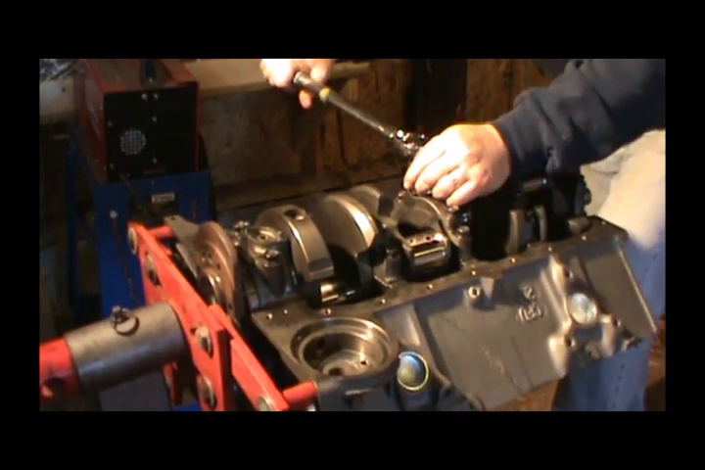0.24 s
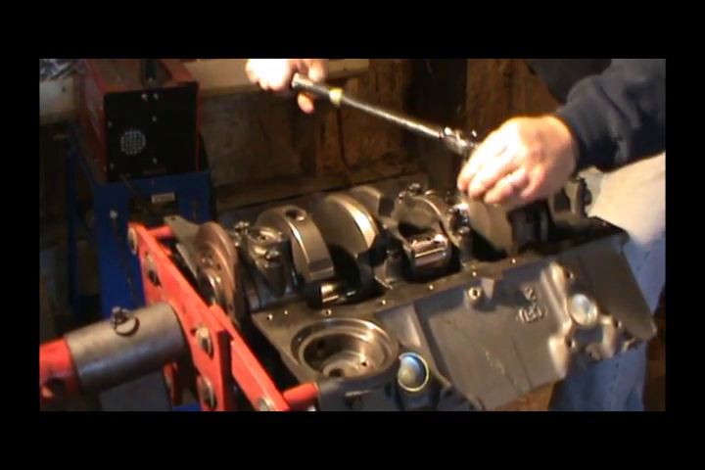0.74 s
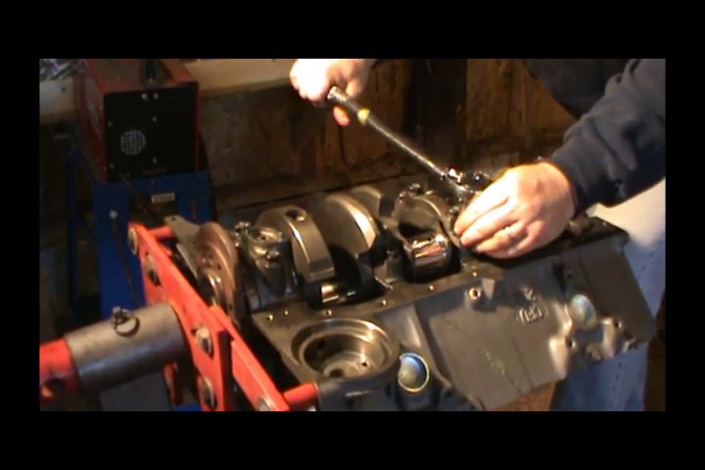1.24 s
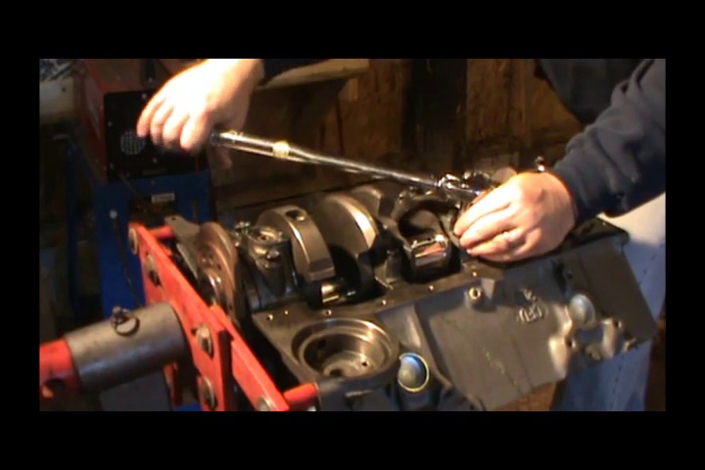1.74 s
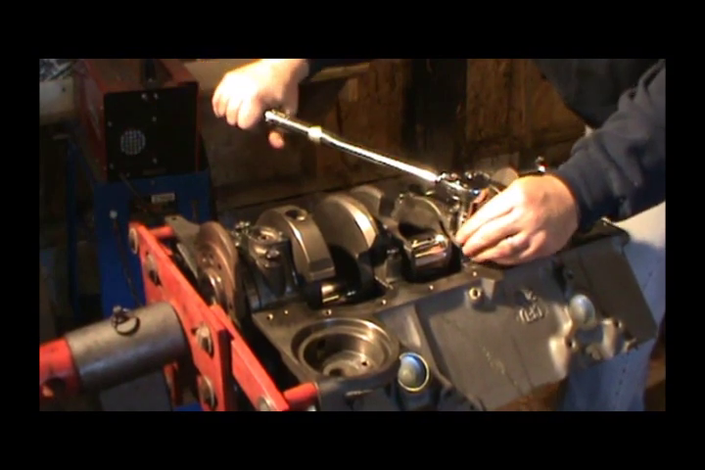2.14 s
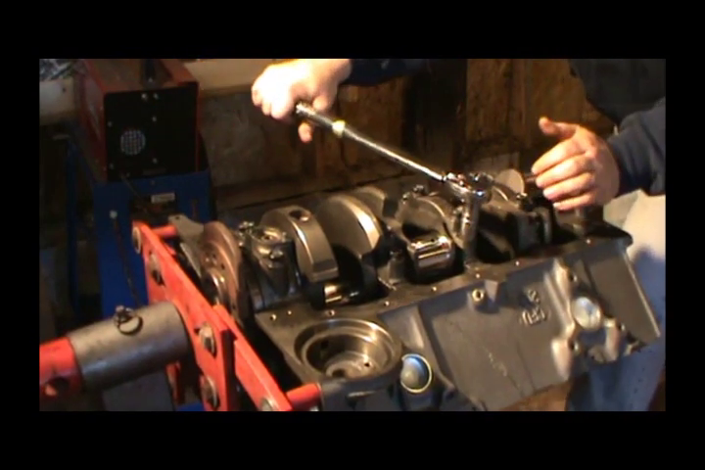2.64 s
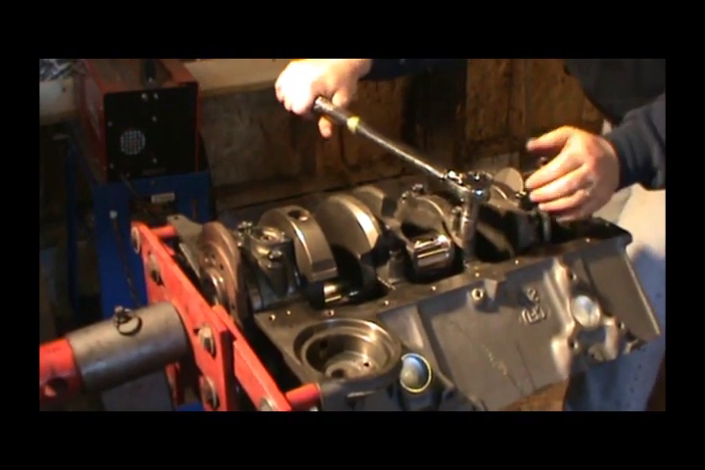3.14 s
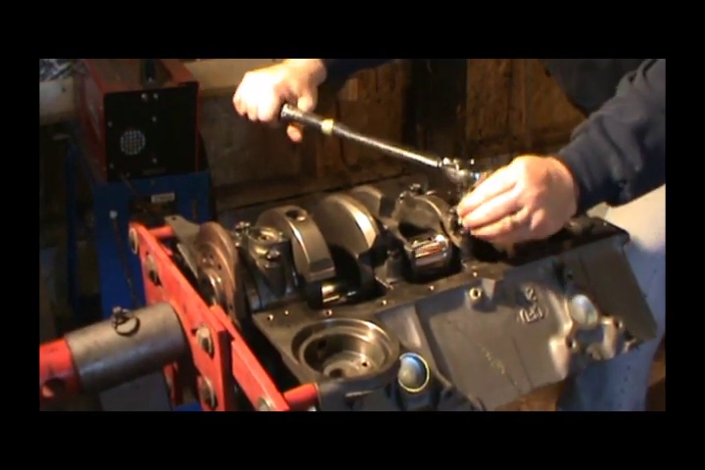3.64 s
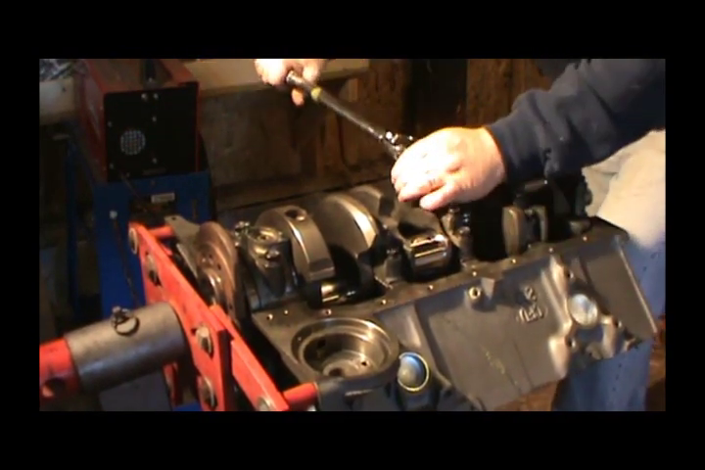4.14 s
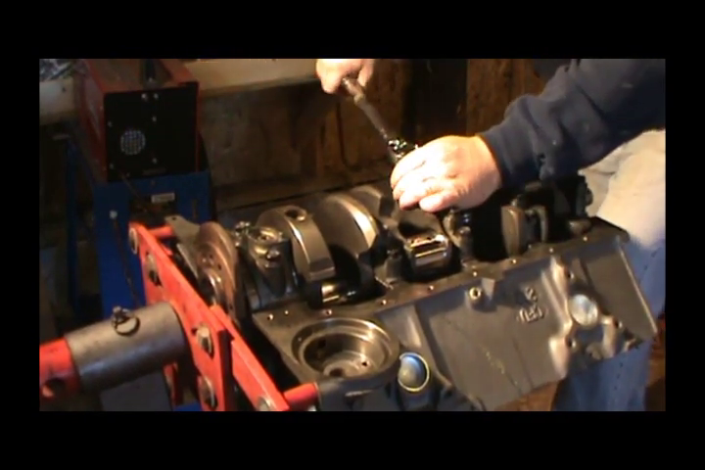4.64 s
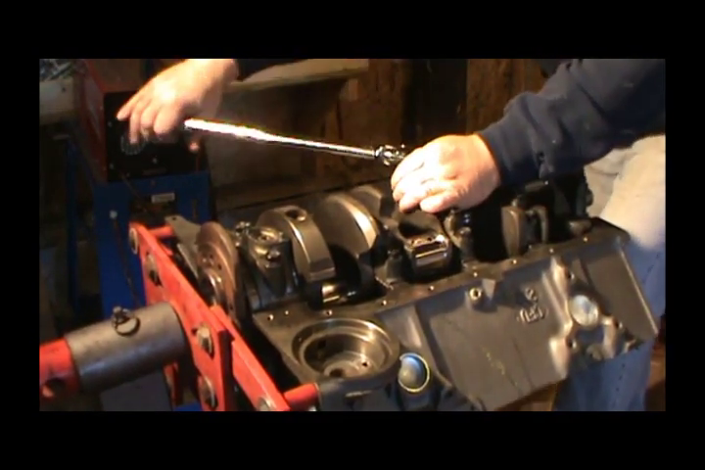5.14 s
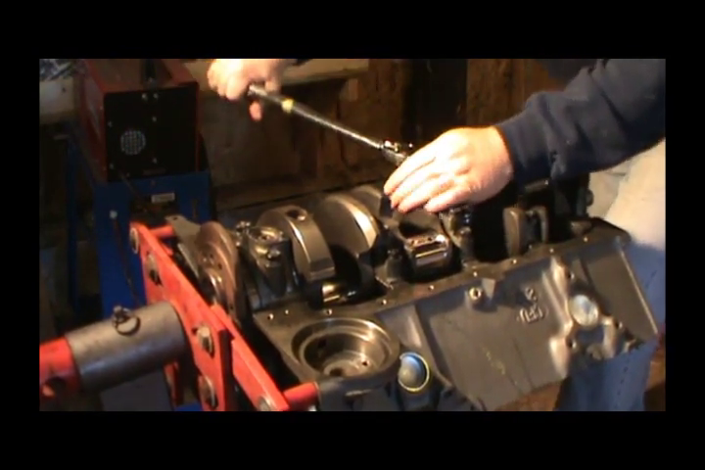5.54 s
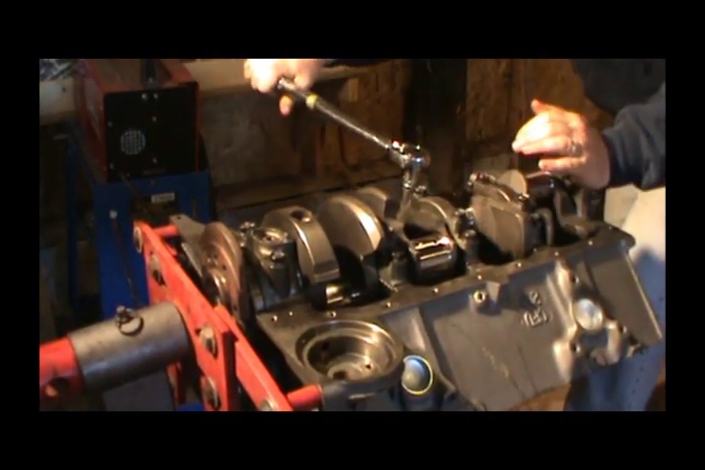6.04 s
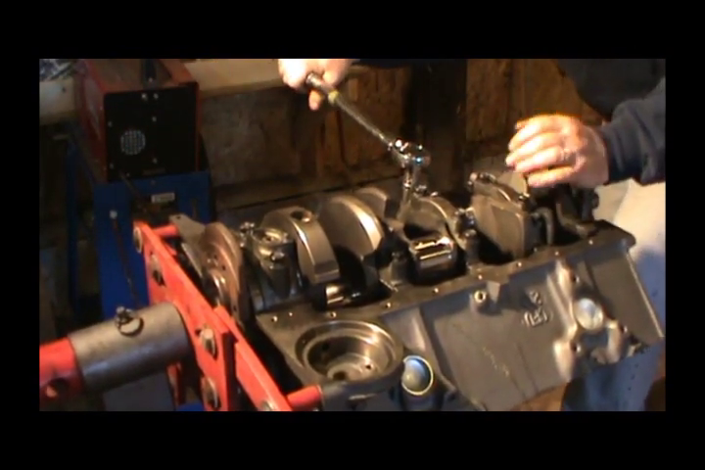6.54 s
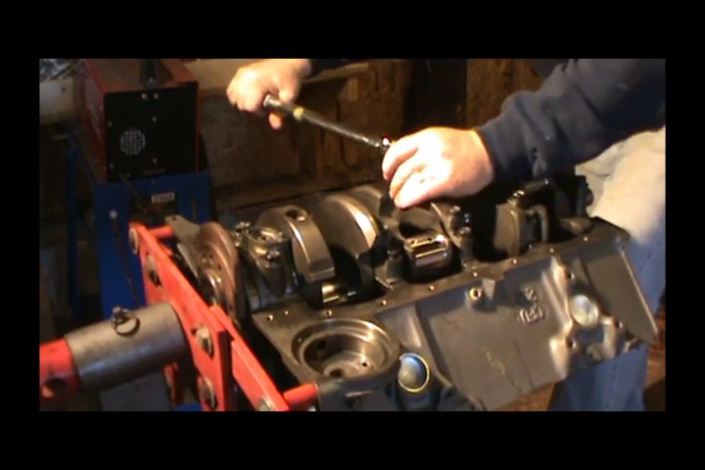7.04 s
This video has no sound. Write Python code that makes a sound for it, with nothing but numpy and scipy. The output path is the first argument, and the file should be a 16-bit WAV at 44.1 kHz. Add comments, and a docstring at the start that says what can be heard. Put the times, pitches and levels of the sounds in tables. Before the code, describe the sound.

Hard, dry steel clicks with short ringing and a brief garage echo: the wrench snaps as it lets go, then snaps again a third of a second later as it resets. Between the pairs are quick ratchet ticks, one strong socket clack, faint taps on bolt heads and soft sleeve scuffing. A quiet low rumble, hiss and barely audible camera motor pips lie underneath.

```python
"""Torque wrench in a garage

A click-type torque wrench tightens bolts on an engine block in a wooden garage. It lets go with a loud
crack and resets with a second one, the ratchet ticks, the socket knocks on bolt heads, hands rustle.
Each contact is a short coloured pulse with quick bounces that rings the steel and echoes in the garage.
Rustle, hiss and rumble are filtered noise; a small camera's motor gives faint sine pips.
A fast limiter holds the loud cracks down."""
import sys
import numpy as np
from scipy import signal
from scipy.fft import rfft, irfft
from scipy.io import wavfile
from scipy.ndimage import uniform_filter1d, minimum_filter1d

SR = 44100
rng = np.random.default_rng(int(sys.argv[2]) if len(sys.argv) > 2 else 0)


def wav_out(sig):
    """Save sig, one row per channel (or a flat mono array), as 16-bit PCM at SR to the path in sys.argv[1]."""
    wavfile.write(sys.argv[1], SR, np.round(np.clip(np.atleast_2d(sig).T, -1, 1) * 32767).astype(np.int16))


def magnitude_from_level(level_db):
    """Linear magnitude for a level in decibels (20 dB per decade)."""
    exponent = np.asarray(level_db, float) / 20
    return 10 ** exponent


N = 321048   # length in samples

# Levels of contacts below are set before the boost that each kind of contact gets.
# The cam slips at the set torque. Each row: start in seconds, level in dB, added highs in dB,
# added bar ring in dB.
RELEASE = [(2.845, -6, -8, 6), (6.325, -4.5, -4, 0)]
# The cam drops back as the pull eases. Each row: start in seconds, level in dB, added highs in dB,
# added bar ring in dB.
RESET = [(0.042, -9, -3, -7), (3.178, -9, -2.8, -2), (6.628, -8, -1.5, -8)]
# The pawl ticks over the teeth. Each row: start in seconds, level in dB, level of the graze before it
# in dB relative to the tick, favoured frequency in Hz.
RATCHET = [(1.609, -6.5, -57, 4100), (1.703, -6, -47, 7360), (1.932, -31.5, -43, 3300),
           (2.041, -43, -45, 3300), (4.949, -10, -12, 4580), (5.027, -9, -11, 4400), (5.11, -6, -12, 5460),
           (5.336, -31.5, -45, 3300), (5.363, -36, -45, 3300)]
# Socket and hand touch the bolts. Each row: start in seconds, level in dB, dullness in dB,
# added socket ping in dB, added bar ring in dB.
SOCKET = [(0.504, -40.5, 16, -11, -14), (1.049, -27.5, -6, 3.5, -6), (1.054, -18.5, 2.5, -19, 8.5),
          (1.161, -32, 9, 12.5, -3), (1.173, -30.5, 1, 7, 0), (1.203, -28, 15, -3, -6),
          (1.285, -44, 17, 9, 0), (1.505, -43, 20, -9, -5), (2.415, -38, 62, -18, -17),
          (2.481, -44, -5, -15, -7), (3.577, -53, -1, 14.5, -14), (3.595, -45, 14, 3, -12),
          (3.823, -49, 9, -14, -12), (4.067, -42.5, 10, -3, -17), (4.173, -6, -4.5, -5, 4),
          (4.296, -31, 21, 6, -10), (4.609, -37, -1, 6, -8), (4.623, -24, 6, -6, -6),
          (4.634, -20.5, 6, -18, -9), (4.841, -46, 21, -6, -7), (5.456, -39, 7, 4.5, -13),
          (5.577, -43, 0, -8, -6), (5.601, -41.5, 32, -12, -8), (5.63, -52, 21, -5, -3),
          (5.66, -42, 19, -2, -12), (5.784, -45, 7, -18, -18), (6.908, -43.5, 47, -11, -7),
          (6.961, -49, 3, 2, -11), (7.057, -37.5, 11, 6, 3), (7.083, -34.5, 6, 8, -20),
          (7.097, -34, 5, -16, -1)]
# Basic tone colour of each kind of contact. Each row: frequency in Hz, relative level in dB.
RELEASE_COLOUR = [(60, -86), (150, -18.5), (400, -8), (650, -9.5), (1000, -11), (1500, -4), (2200, -2.5),
                  (3000, -2), (4250, 4), (4950, -6), (5800, 4.5), (7600, 3), (9500, 0.5), (11500, -1),
                  (13500, -23), (15500, -56), (17000, -80.5)]
RESET_COLOUR = [(60, -76), (150, -17), (400, -4), (650, -4.5), (1000, -1.5), (1500, 0), (2200, 4.5),
                (3000, 1.5), (4100, 8.5), (5100, 2.5), (6200, 5), (7600, -1), (9500, -2), (11500, -7.5),
                (13500, -33), (15500, -44), (17000, -66)]
RATCHET_COLOUR = [(60, -68), (150, -65), (400, -20), (650, -22), (1000, -14.5), (1500, -9), (2200, -2),
                  (3000, 2), (4100, 4.5), (5100, 4), (6200, -5.5), (7600, -2.5), (9500, -1.5), (11500, -8),
                  (13500, -16), (15500, -26), (17000, -67)]
SOCKET_COLOUR = [(60, -48), (150, -53), (400, -7.5), (650, -6), (1000, -5), (1500, 1), (2200, 0),
                 (3000, 1.5), (4100, 2.5), (5100, -1), (6200, -6), (7600, -4), (9500, -10.5),
                 (11500, -14.5), (13500, -24), (15500, -40), (17000, -131)]
# Ringing tones of wrench, socket and block. Each row: frequency in Hz, time to die by 60 dB in seconds,
# then basic ring level in dB for a release, a reset, a ratchet tick and a socket knock.
STEEL = [(139.2, 0.97, -52, -69, -60, -80), (800, 0.48, -51, -58, -65, -96),
         (960, 0.28, -40, -38, -50.5, -31), (1373, 0.25, -36, -28, -50.5, -24.5),
         (2284, 0.36, -38, -44, -53.5, -59), (2420, 0.3, -51, -48, -38, -54),
         (3373, 0.082, -23, -24.5, -32, -17), (3193, 0.067, -27, -39, -62, -17.5),
         (3980, 0.33, -44, -43, -61, -64), (4360, 0.1, -59, -62, -57, -63),
         (4640, 0.23, -64, -30, -46, -55), (5100, 0.051, -56.5, -48, -70, -36),
         (5700, 0.27, -48, -45, -43, -37), (5550, 0.038, -12, -50, -27, -50),
         (7390, 0.35, -52, -30, -55, -51), (7447, 0.21, -48, -23, -41, -34),
         (7040, 0.18, -47, -51, -50, -60), (10150, .04, -57, -54, -34, -62),
         (15230, 0.18, -40, -36, -72, -72)]
# How long the garage echoes last. Each row: frequency in Hz, time to die by 60 dB in seconds.
GARAGE = [(250, 0.51), (660, 0.57), (1740, 0.46), (4590, 0.37), (12100, 0.23)]
# How alike the echoes are left and right. Each row: frequency in Hz, likeness from 0 to 1.
ROOM_LIKENESS = [(60, 0.91), (180, 1), (550, 0.95), (1650, 0.48), (4970, 0.34), (15000, 0.73)]
# Colour of hiss and rumble. Each row: frequency in Hz, relative level per Hz in dB.
FLOOR_COLOUR = [(12, -46), (20, -14), (60, -0.5), (108, -5), (135, -5.5), (212, -6), (351, -7.5),
                (404, -6.5), (551, -12.5), (599, -8.5), (1240, -15), (2370, -15), (3060, -20.5),
                (15200, -26.5), (16500, -37)]
# How alike hiss and rumble are left and right. Each row: frequency in Hz, likeness from 0 to 1.
FLOOR_LIKENESS = [(60, 1.0), (150, 0.98), (380, 0.82), (950, 0.19), (2380, 0.041), (5980, 0.26),
                  (15000, 0.93)]
# Faint steady tones. Each row: frequency in Hz, rms level in dB.
STEADY_TONES = [(140, -73), (409, -77), (15734, -87)]
# Hands and sleeves moving over the work. Each row: time in seconds, rms level in dB before the lumps.
RUSTLE = [(0, -52.5), (.4, -56.5), (1.0, -71), (1.35, -55.5), (1.95, -58), (2.1, -67), (2.42, -63),
          (2.52, -54), (2.7, -71), (3.55, -60), (3.9, -64), (4.1, -75), (4.45, -57.5), (4.85, -62.5),
          (5.3, -57), (5.62, -54.5), (5.72, -61.5), (6.3, -63), (6.92, -73), (7.12, -55.5), (7.28, -88)]
# The camera's lens motor at work. Each row: start in seconds, end in seconds.
MOTOR_RUNS = [(2.05, 3.9), (5.55, 7.5)]
BAND_EDGES_HZ = 18 * 2 ** np.arange(0, 10.1, .5)   # half an octave apart


def at_hz(points, hz):
    """Reads a table of frequency and value, spacing the frequencies as octaves."""
    table_hz, values = np.transpose(points)
    return np.interp(np.log(hz), np.log(table_hz), values)


def stereo_bands(size, likeness, gain):
    """Half-octave bands of noise; the sum and difference of two noises set left-right likeness."""
    out, white = 0, rng.standard_normal((2, 2, size))
    for k, (low, high) in enumerate(zip(BAND_EDGES_HZ, BAND_EDGES_HZ[1:])):
        band = signal.butter(2, [low, high], "band", fs=SR, output="sos")
        mid, side = signal.sosfilt(band, white[k % 2])   # neighbours use different noise
        hz = np.sqrt(low * high)
        alike = np.clip(at_hz(likeness, hz), 0, 1)
        stereo = np.sqrt(1 + alike) * mid + np.sqrt(1 - alike) * side * [[1], [-1]]
        out = out + gain(hz) * stereo
    return out


def floor(level_db=-57.5):
    """Microphone hiss over distant rumble, as coloured noise, with faint steady sine tones."""
    noise = stereo_bands(N, FLOOR_LIKENESS, lambda hz: magnitude_from_level(at_hz(FLOOR_COLOUR, hz)))
    t = np.arange(N) / SR
    tones = 0
    for hz, rms_db in STEADY_TONES:
        # a sine peaks 3 dB above its rms level
        tones = tones + magnitude_from_level(rms_db + 3) * np.sin(2 * np.pi * hz * t + rng.uniform(0, 6))
    return magnitude_from_level(level_db) * noise / noise.mean(axis=0).std() + tones


def rustle(lumps_per_s=31.0, lumpy_db=3.5):
    """Soft scuffing of hands and sleeves: mid-range noise whose level wanders in quick lumps."""
    band = signal.butter(2, [870, 4730], "band", fs=SR, output="sos")
    noise = signal.sosfilt(band, rng.standard_normal((2, N)))
    t = np.arange(N) / SR
    knots = np.arange(0, N / SR + 1, 1 / lumps_per_s)
    lumps_db = lumpy_db * np.interp(t, knots, rng.standard_normal(len(knots)))
    times, levels_db = np.transpose(RUSTLE)
    return magnitude_from_level(np.interp(t, times, levels_db) + lumps_db) * noise / noise.std()


def lens_motor(first_pip_s=.002, frames_per_s=29.97, idle_drop_db=-14.0):
    """The motor steps once a frame, a short pip of two sines, fainter while it idles."""
    t = np.arange(N) / SR
    since = (t - first_pip_s) % (1 / frames_per_s)
    running = sum((t > start) & (t < end) for start, end in MOTOR_RUNS)
    idle_db = idle_drop_db * (1 - running)
    pips = 0
    # peak level in dB while running, frequency in Hz, length in seconds
    for peak_db, hz, pip_s in [(-62, 1920, 0.026), (-62.5, 4800, 0.0098)]:
        swell = np.sin(np.pi * np.clip(since / pip_s, 0, 1)) ** 2
        pips = pips + magnitude_from_level(peak_db + idle_db) * swell * np.sin(2 * np.pi * hz * t)
    return pips


def pulse(level_db):
    """The shortest causal pulse with this spectrum (minimum phase), scaled to height 1."""
    cepstrum = irfft(level_db * np.log(10) / 20)
    half = len(cepstrum) // 2
    # fold the second half onto the first, so that nothing sounds ahead of the hit
    cepstrum[1:half] *= 2
    cepstrum[half + 1:] = 0
    shape = irfft(np.exp(rfft(cepstrum)))
    return shape / np.abs(shape).max()


def contact_colour(colour, hz, low_db, high_db, band_hz, band_db):
    """Spectrum of one contact in dB: its kind's colour with more or less lows, highs and one band."""
    level_db = at_hz(colour, hz) + low_db / (1 + (hz / 1900) ** 4) + high_db / (1 + (6000 / hz) ** 6)
    level_db += band_db * np.exp(-.5 * ((hz - band_hz) / 250) ** 2)
    # every contact lands on another spot and favours other bands, with a spread of 2 dB
    return level_db + np.interp(hz, np.arange(0, SR / 2, 700), 2.0 * rng.standard_normal(32))


def ring_steel(strikes, column):
    """Each steel tone is a resonator that a strike sets ringing and that dies away by itself."""
    rings = 0
    for k, mode in enumerate(STEEL):
        hz, t60_s = mode[:2]
        r, w = magnitude_from_level(-60 / (t60_s * SR)), 2 * np.pi * hz / SR   # decay and turn per sample
        if k == 3:
            row = 3   # the bar
        elif k in (6, 7):
            row = 2   # the socket
        else:
            row = int(hz > 6500)   # other tones, low or high
        # hits drive the low and high tones unevenly
        uneven = magnitude_from_level(3.9 * (row < 2) * rng.standard_normal(64))[np.arange(N) % 61]
        drive = strikes[row] * uneven + 1e-18   # the tiny offset keeps the numbers from vanishing
        ring = signal.lfilter([0, np.sin(w)], [1, -2 * r * np.cos(w), r * r], drive)
        rings = rings + magnitude_from_level(mode[column]) * ring
    return rings


def contacts(events, colour, column, boost_db, wet_db, snap_db):
    """A crack rings the steel, then bounces seven times; returns direct sound and sound to the walls."""
    hz, size = np.maximum(np.arange(1025) * SR / 2048, 20), 2048   # pulse length in samples
    close, far = np.zeros((2, N + size)), np.zeros((2, N + size))
    strikes = np.zeros((4, N))   # what drives the low tones, high tones, socket and bar
    for s, hit_db, low_db, high_db, socket_db, bar_db, chatter_ms, pan_db, band_hz, band_db in events:
        late_draw, height_draw, sign_draw = rng.random((3, 7))
        late = np.append(0, late_draw)   # the crack itself, then seven bounces
        spread_ms = chatter_ms * (3 if hit_db < -36 else 1)   # light touches bounce for longer
        at = np.round((s + late * spread_ms / 1000) * SR).astype(int)
        bounce_db = -np.append(0, 3.6 + 4.2 * height_draw) - 2.3 * late
        heights = magnitude_from_level(hit_db + boost_db + bounce_db) * np.append(1, np.sign(sign_draw - .5))
        sides = magnitude_from_level(np.array([[.5], [-.5]]) * pan_db)
        level_db = contact_colour(colour, hz, low_db, high_db, band_hz, band_db)
        far[:, at[0]:at[0] + size] += heights[0] * sides * pulse(level_db)
        # the topmost treble beams straight at the microphone, so snap_db shapes only the close sound
        soft = np.clip((-10.0 - hit_db) / 20.0, 0, 1)   # a gentle touch is fainter and duller
        snap = (snap_db - 13.0 * soft) / (1 + (12500 / hz) ** 8)
        crack = magnitude_from_level(-6.0 * soft) * pulse(level_db + snap)
        for i, height in zip(at, heights):
            close[:, i:i + size] += height * sides * crack
        drive_db = np.array([-abs(low_db) / 2, min(high_db, 0), socket_db, bar_db])
        strikes[:, at[0]] += heights[0] * magnitude_from_level(drive_db)
    rings = ring_steel(strikes, column)
    direct = close[:, :N] + magnitude_from_level(3.0) * rings
    to_walls = magnitude_from_level(wet_db) * (far[:, :N] + .2 * rings)   # a fifth of the ringing reaches the walls
    return np.array([direct, to_walls])


def cam(rows, lows_db, band_hz):
    """Cam cracks share their bounces, lows and place, and one band stands out in each kind."""
    ping_db, chatter_ms, pan_db, band_db = 0, 10.0, -0.8, 6.5
    return [(s, hit_db, lows_db, high_db, ping_db, bar_db, chatter_ms, pan_db, band_hz, band_db)
            for s, hit_db, high_db, bar_db in rows]


def cam_reset():
    """The cam drops back as the pull eases: a bright crack that favours a high band."""
    return contacts(cam(RESET, lows_db=-4.0, band_hz=7830), RESET_COLOUR, column=3,
                    boost_db=12.0, wet_db=2.0, snap_db=20.0)


def garage(source, near_db=-19.5, near_t60_s=0.035, walls_db=-28.5, fade_in_s=0.00057):
    """Dense noise-like echoes: quick ones off block and bench, then the walls dying band by band."""
    t = np.arange(SR) / SR

    def decay(hz):
        """Level of the echoes in one band over time, near and wall echoes added."""
        near = magnitude_from_level(near_db - 60 * t / near_t60_s)
        walls = magnitude_from_level(walls_db - 60 * t / at_hz(GARAGE, hz))
        return near + walls

    echoes = stereo_bands(SR, ROOM_LIKENESS, decay) * np.clip(t / fade_in_s, 0, 1)
    return signal.fftconvolve(source, echoes, axes=1)[:, :N]


def side_of(hit_db):
    """Left-over-right level in dB: gentle touches come from the hand on the right."""
    return max(0.2 * hit_db, -2)


def socket_knocks():
    """Socket and hand touch the bolts; a dull knock has more lows and fewer highs."""
    lows_share, chatter_ms, band_hz = 0.36, 5.3, 3300   # the rest of the dullness is lost highs
    events = []
    for s, hit_db, dull_db, ping_db, bar_db in SOCKET:
        low_db, high_db = lows_share * dull_db, (lows_share - 1) * dull_db
        band_db = max(ping_db, 0)   # a strong ping colours the knock too
        events.append((s, hit_db, low_db, high_db, ping_db, bar_db, chatter_ms, side_of(hit_db),
                       band_hz, band_db))
    return contacts(events, SOCKET_COLOUR, column=5, boost_db=1.5, wet_db=1.0, snap_db=-23.0)


def ratchet():
    """The pawl grazes a tooth tip, then ticks; weak ticks are dull and ring the bar less."""
    full_tick_db, graze_lead_s, chatter_ms = -9.5, 0.0055, 3.1
    ping_db, full_bar_db = 5.5, 9.5
    events = []
    for s, hit_db, graze_db, band_hz in RATCHET:
        weak_db = max(full_tick_db - hit_db, 0)
        graze_hit_db = hit_db + graze_db
        events.append((s - graze_lead_s, graze_hit_db, -5, 3, ping_db, -full_bar_db, chatter_ms,
                       side_of(graze_hit_db), band_hz, 0))
        low_db = 4.5 + 0.77 * weak_db
        high_db = 8 - 0.59 * weak_db
        bar_db = full_bar_db - .45 * weak_db
        events.append((s, hit_db, low_db, high_db, ping_db, bar_db, chatter_ms,
                       side_of(hit_db), band_hz, 7.5))
    return contacts(events, RATCHET_COLOUR, column=4, boost_db=1.0, wet_db=-2.5, snap_db=10.0)


def cam_release():
    """The cam slips at the set torque: the loud crack as the wrench lets go."""
    return contacts(cam(RELEASE, lows_db=-2.6, band_hz=4070), RELEASE_COLOUR, column=2,
                    boost_db=11.5, wet_db=0.5, snap_db=22.0)


def scene():
    """Steel contacts echo in the garage over rustle, hiss, rumble and the camera's motor."""
    direct, to_walls = cam_reset() + socket_knocks() + ratchet() + cam_release()
    return direct + garage(to_walls) + rustle() + floor() + lens_motor()


def top_cut(x):
    """Nothing passes above the cut-off."""
    return signal.sosfilt(signal.butter(12, 16970, fs=SR, output="sos"), x)


def record(dry, ceiling_db=-3.5, release_db_s=907.0):
    """A fast limiter turns loud cracks down and lets go within milliseconds; spikes are rounded."""
    t = np.arange(N) / SR
    over_db = np.maximum(20 * np.log10(np.abs(dry).max(axis=0) + 1e-9) - ceiling_db, 0)
    # hold each peak, then let go at a steady rate in dB per second
    held_db = np.maximum.accumulate(over_db + release_db_s * t) - release_db_s * t
    ahead_db = -minimum_filter1d(-held_db, size=111)   # it acts 55 samples early
    limited = dry * magnitude_from_level(-uniform_filter1d(ahead_db, size=45))
    top = .75   # the tallest spikes bend smoothly towards this height
    rounded = top * np.tanh(limited / top)
    treble_cut = signal.cheby2(12, 60, 17300, fs=SR, output="sos")
    mix = signal.sosfilt(treble_cut, rounded)
    return top_cut(mix)


dry = scene()
out = record(dry)
wav_out(out)
```